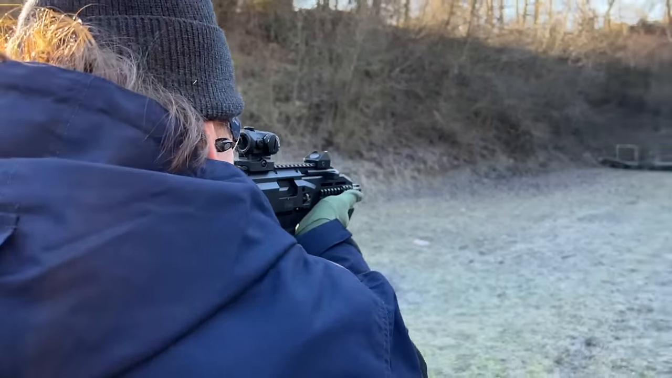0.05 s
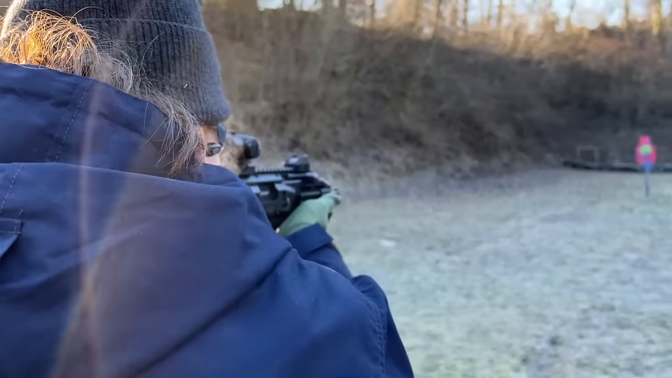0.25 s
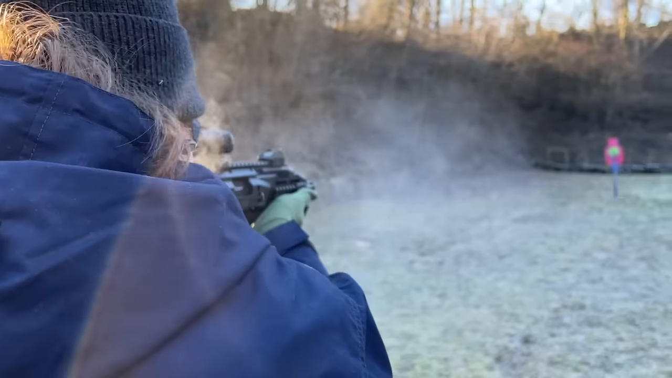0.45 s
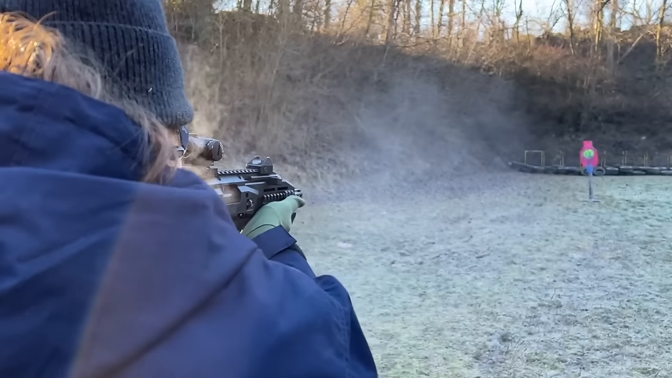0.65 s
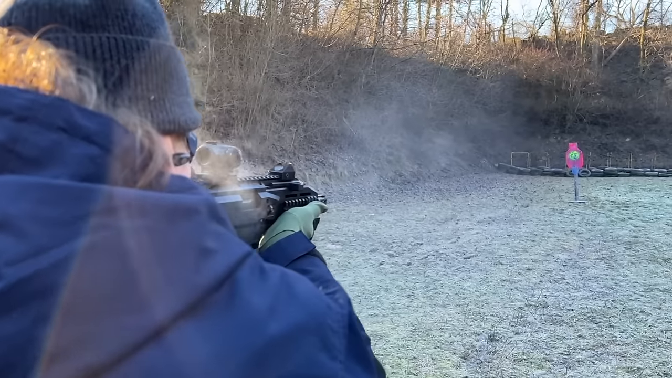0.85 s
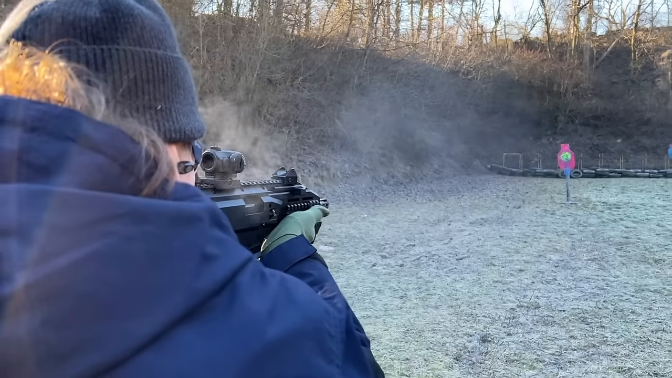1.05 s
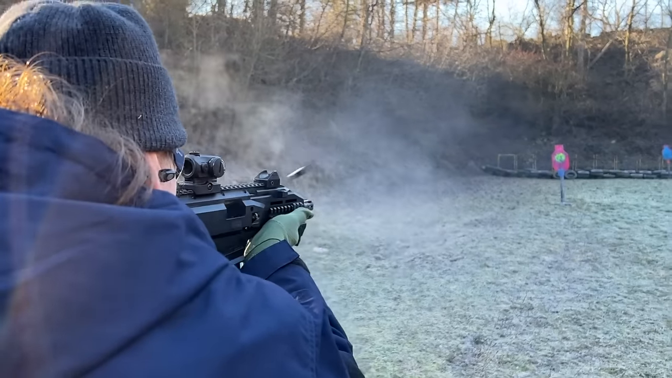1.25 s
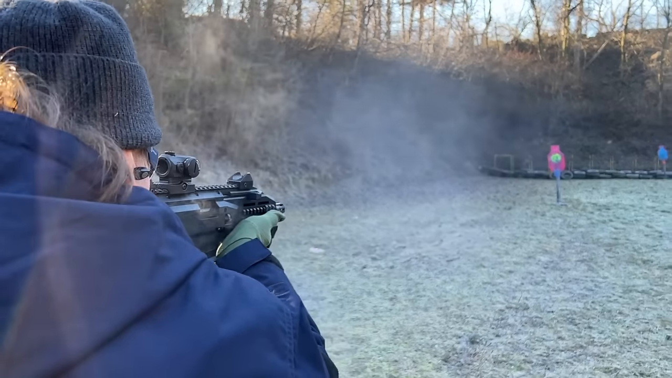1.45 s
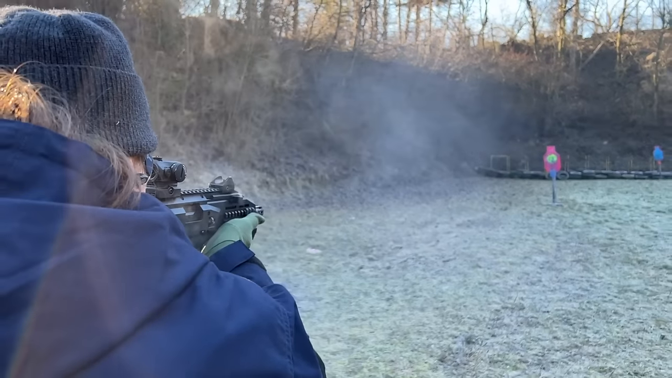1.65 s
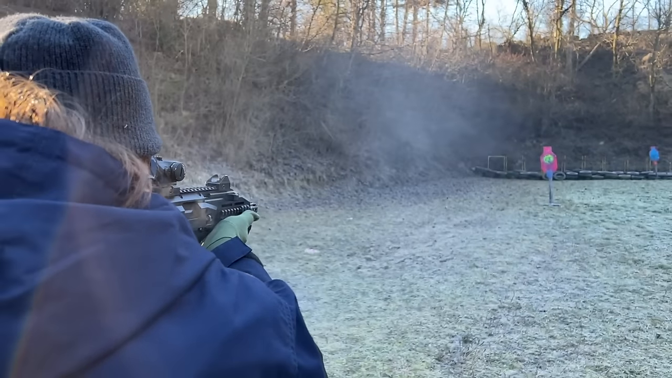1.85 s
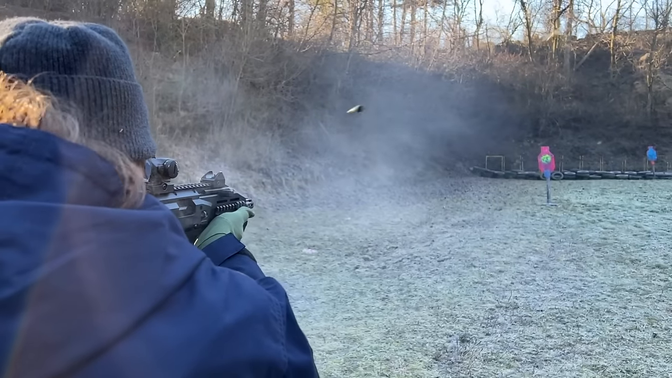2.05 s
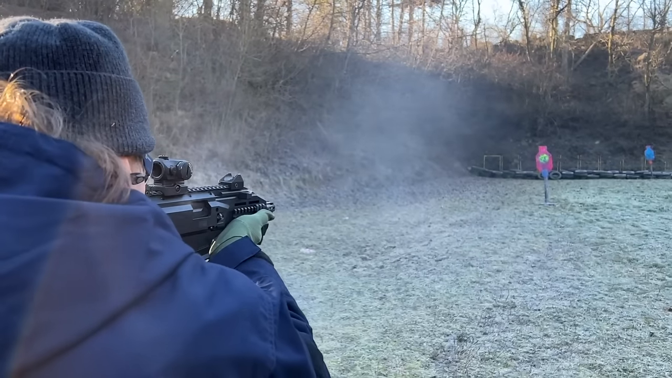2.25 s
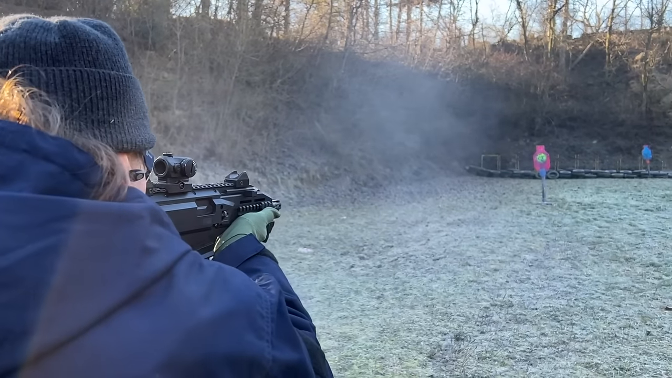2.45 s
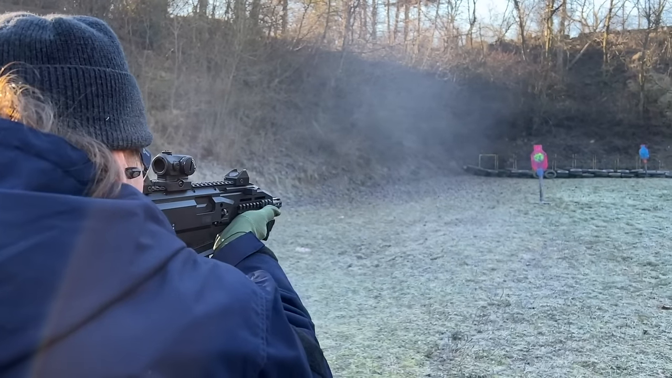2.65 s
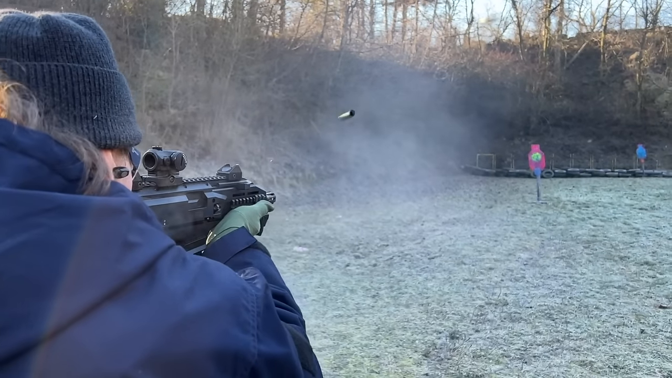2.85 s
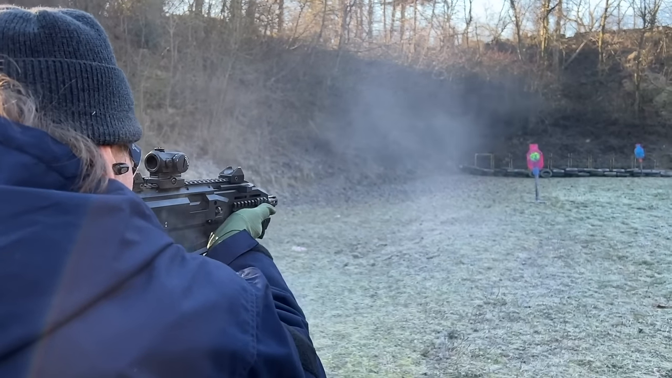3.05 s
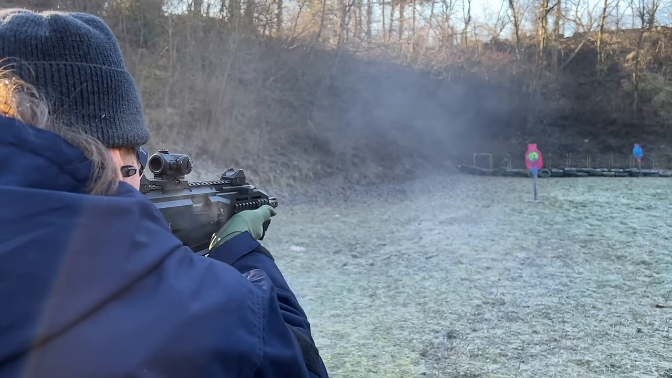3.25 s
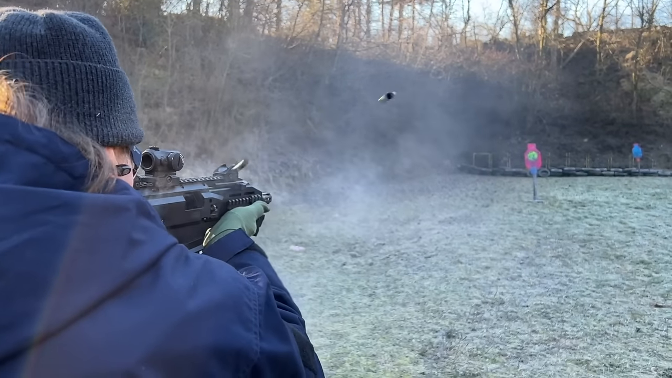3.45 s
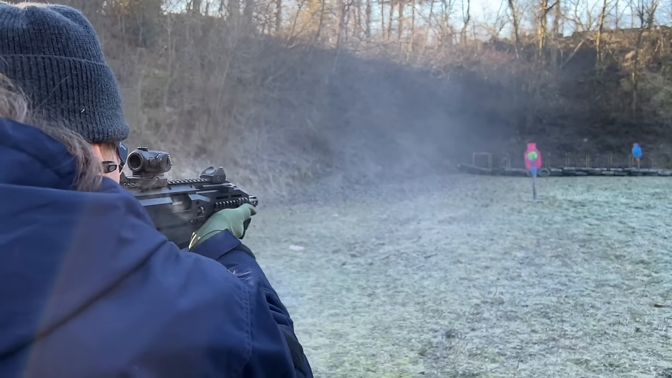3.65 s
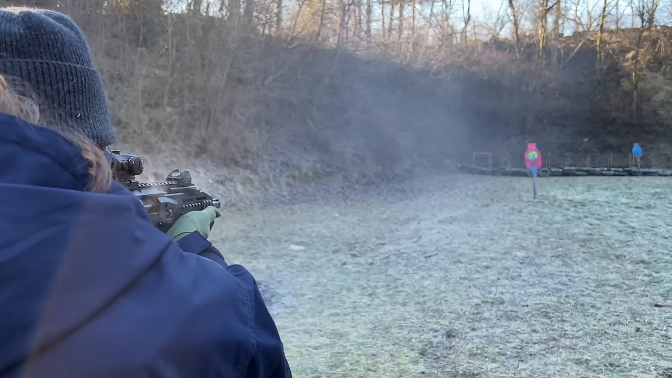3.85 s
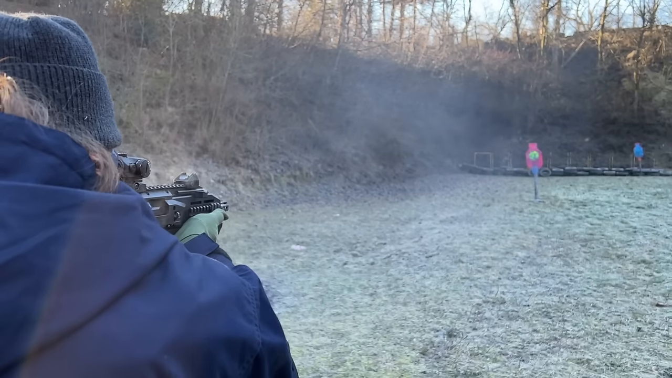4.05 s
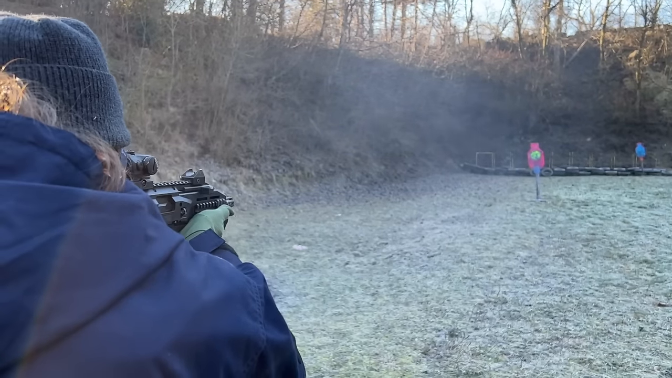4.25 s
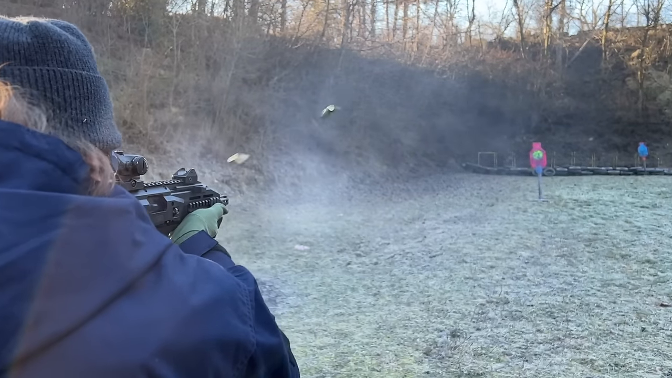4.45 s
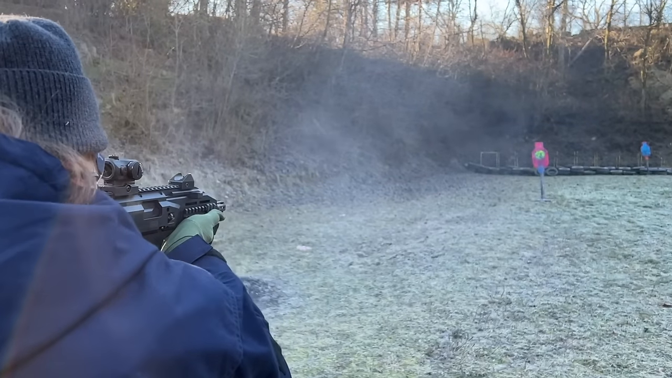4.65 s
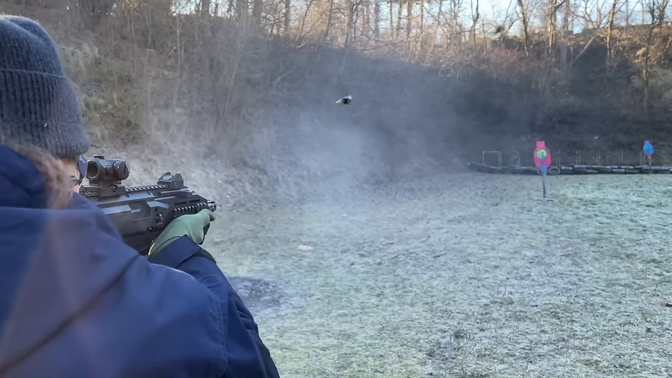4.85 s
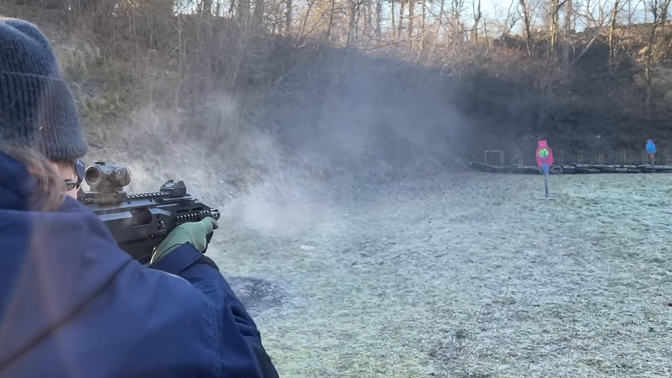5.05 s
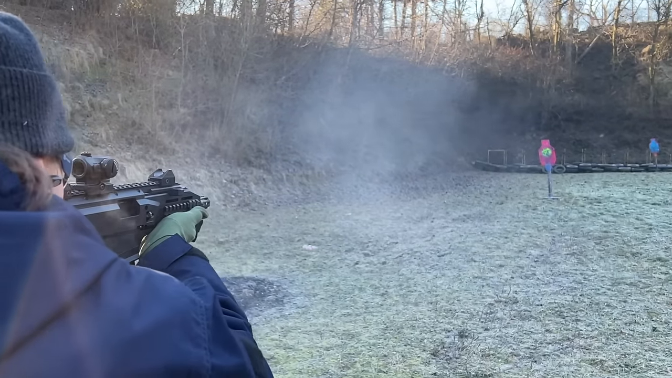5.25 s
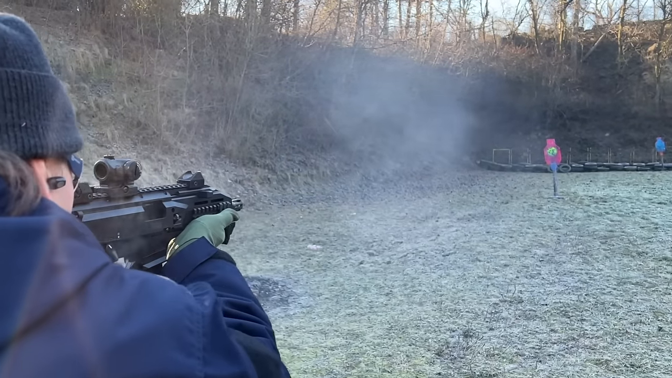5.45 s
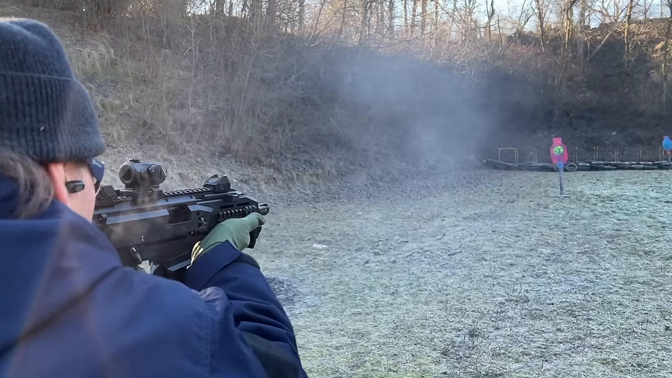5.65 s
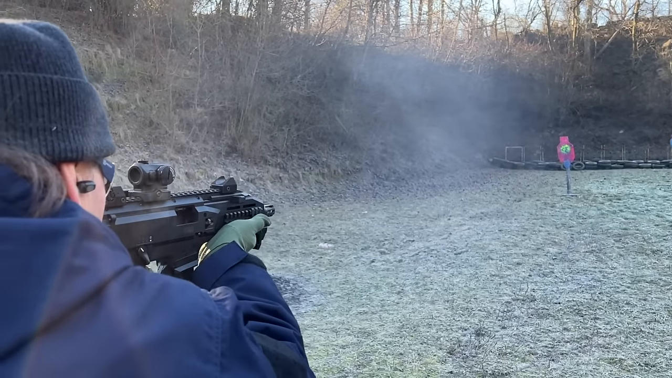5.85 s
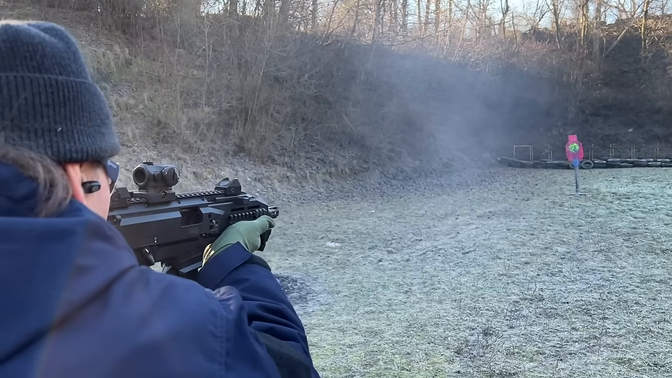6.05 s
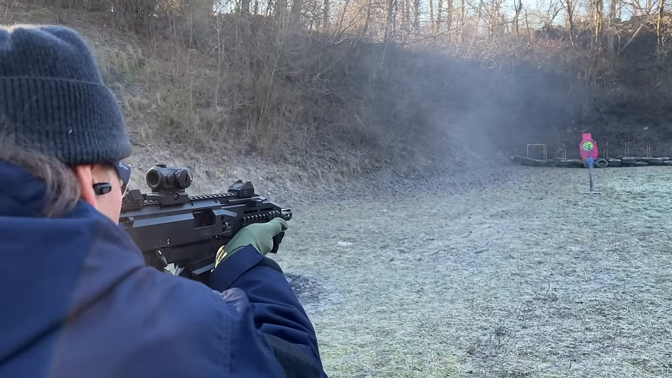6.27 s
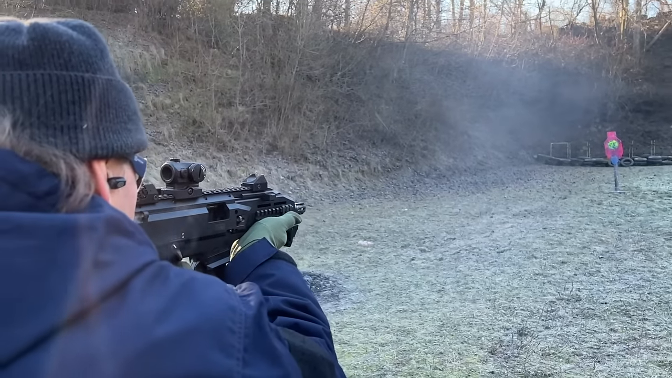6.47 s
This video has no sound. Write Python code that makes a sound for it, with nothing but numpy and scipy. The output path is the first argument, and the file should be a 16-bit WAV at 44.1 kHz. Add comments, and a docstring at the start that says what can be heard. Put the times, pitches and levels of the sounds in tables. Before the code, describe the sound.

Quick paired gunshots, loud and slightly overloaded, burst out right beside the microphone. Bullets ping on a nearer and a farther steel plate a moment later, and noisy echoes wash back from bank and trees. A very faint low hum lies in the pauses above quiet air. The last three bursts come close together, then the echo dies into metallic handling clicks and fabric rustle.

```python
"""On an outdoor range a submachine gun fires two-round bursts, heard just behind the shooter, over low air noise.
Each shot is a noise crack with bolt noise, falling-sweep thumps, then noise echoes from ground, bank and woods.
After the bullet's flight and the way back, steel plates splat and ring in decaying modes; a dull late thud
returns from behind the bank. A faint sine hum fills pauses; handling clicks excite resonances between
and after the bursts, and band-passed noise rustles as clothing once the firing stops."""
import sys
import numpy as np
from scipy import signal
from scipy.io import wavfile

SR = 44100
rng = np.random.default_rng(int(sys.argv[2]) if len(sys.argv) > 2 else 0)


def materialize(psi):
    """Save the field psi as 16-bit PCM at rate SR to the path in sys.argv[1].

    A 1-D psi becomes a single channel; in a 2-D psi each row is a channel.
    """
    bounded = np.clip(np.atleast_2d(psi).T, -1, 1)
    quanta = np.round(bounded * 32767).astype(np.int16)
    wavfile.write(sys.argv[1], SR, quanta)


N = 287114

# shots: t/s, crack level/dB, thump level/dB, echo level/dB
SHOTS = [(0.2729, -2, -8.5, -14.5), (0.3313, -1.5, -7.5, 2.5), (1.223, -2.5, -9, 1.5), (1.28, -3, -8, -6),
         (1.917, -3, -8, -2), (1.9743, -5, -7.5, -5), (2.721, -3, -9.5, -1.5), (2.778, -3, -10, -7),
         (3.372, -2, -9, -2), (3.4275, -4, -11, -6.5), (4.3601, -2.5, -8, -2), (4.4165, -2.5, -13, -8),
         (4.7116, -2.5, -9, -6.5), (4.7674, -2, -7, -8.5), (5.0452, -2.5, -8.5, -3),
         (5.1022, -2, -12.5, -7.5)]


def amp(db):
    """Amplitude ratio of a level in dB."""
    return 10 ** (np.asarray(db) / 20)


def curve(rows, t):
    """Straight lines between (time, value) points."""
    return np.interp(t, *np.transpose(rows))


def at_hz(points, hz):
    """Interpolate (frequency, value) points along log frequency."""
    points_hz, values = np.transpose(points)
    return np.interp(np.log(hz), np.log(points_hz), values)


def clicks(times_s, sizes):
    """A train of single-sample impulses on a tiny offset that keeps filters off denormals."""
    train = np.full(N, 1e-18)
    train[np.round(np.asarray(times_s) * SR).astype(int)] = sizes
    return train


def arrivals(rows, t):
    """Envelope of arrivals that rise, hold and die away; they add in power."""
    power = 1e-20
    for start_s, rise_s, hold_s, db, t60_s in rows:
        fall_db = -60 * np.maximum(t - start_s - rise_s - hold_s, 0) / t60_s
        rise = np.clip((t - start_s) / rise_s, 0, 1)
        power = power + (rise * amp(db + fall_db)) ** 2
    return np.sqrt(power)


def after_each(times_s, db, shape):
    """Envelope in which every event starts the same shape; overlaps add in power."""
    power, shape_power = np.zeros(N), shape ** 2
    for s, gain in zip(times_s, amp(db)):
        i = round(s * SR)
        power[i:i + len(shape)] += gain ** 2 * shape_power[:N - i]
    return np.sqrt(power)


def grain(hz, depth_db):
    """Fast random gain of rms 1: low-passed noise, with corner near hz, moves the level in dB."""
    r = np.exp(-2 * np.pi * hz / SR)
    flicker = signal.lfilter([1], [1, -2 * r, r * r], rng.standard_normal(N))
    gain = amp(depth_db * flicker / flicker.std())
    return gain / np.sqrt(np.mean(gain ** 2))


def band_pass(x, low_hz, high_hz):
    """Butterworth band-pass."""
    return signal.sosfilt(signal.butter(2, [low_hz, high_hz], "band", fs=SR, output="sos"), x)


def resonance(x, hz, width_hz):
    """Two-pole band-pass with gain 1 on top."""
    r, w = np.exp(-np.pi * width_hz / SR), 2 * np.pi * hz / SR
    zeros = np.array([1, 0, -1]) * (1 - r * r) / 2
    poles = [1, -(1 + r * r) * np.cos(w), r * r]
    return signal.lfilter(zeros, poles, x + 1e-18)


def strike(times_s, db, modes, spread_db):
    """Each blow rings every decaying mode with a random strength and sign of its own."""
    out, chance = np.zeros(N), rng.standard_normal((len(times_s), len(modes), 2))
    for k, (hz, level_db, t60_s) in enumerate(modes):
        r, w = amp(-60 / (t60_s * SR)), 2 * np.pi * hz / SR
        sizes = amp(db + level_db + spread_db * chance[:, k, 0]) * np.sign(chance[:, k, 1])
        out += signal.lfilter([0, np.sin(w)], [1, -2 * r * np.cos(w), r * r], clicks(times_s, sizes))
    return out


def noise_bands(spectrum):
    """Half-octave bands of stereo noise as (centre Hz, band); their sum has rms of about 1."""
    # left-right likeness of the noise: f/Hz, likeness (0..1)
    likeness = [(60, 0.86), (500, 0.51), (3000, 0.14), (12000, 0.97)]
    edges_hz, white = 25 * 2 ** np.arange(0, 9.6, .5), rng.standard_normal((2, 2, N))
    centres_hz = np.sqrt(edges_hz[1:] * edges_hz[:-1])
    band_power = amp(at_hz(spectrum, centres_hz)) ** 2 * np.diff(edges_hz)
    total = np.sqrt(np.sum(band_power) / (SR / 2))
    for k, hz in enumerate(centres_hz):
        mid, side = band_pass(white[k % 2], edges_hz[k], edges_hz[k + 1])
        alike = np.clip(at_hz(likeness, hz), 0, 1)
        band = np.sqrt(.5 + alike / 2) * mid + np.sqrt(.5 - alike / 2) * side * [[1], [-1]]
        yield hz, band * amp(at_hz(spectrum, hz)) / total


def sweep(start_hz, end_hz, glide_s, peak_s):
    """A thump: its pitch falls while it swells and dies."""
    t = np.arange(SR // 8) / SR
    pitch_hz = end_hz + (start_hz - end_hz) * np.exp(-t / glide_s)
    phase = 2 * np.pi * np.cumsum(pitch_hz) / SR
    return np.sin(phase) * (t / peak_s) * np.exp(1 - t / peak_s)


def background():
    """Low air noise, loud around the first burst, then sinking; bass after each shot; clothing rustle."""
    # air noise: t/s, level/dB
    noise_level_points = [(0, -73.5), (.25, -54), (.9, -67), (1.8, -75), (3.3, -72.5), (4.1, -77),
                          (5.7, -87.5), (6.5, -76)]
    # air noise spectrum: f/Hz, density/dB per Hz
    air_colour = [(15, -41), (25, -9), (70, -7), (118, -16), (159, -25), (193, -37.5), (492, -40.5),
                  (543, -48.5), (9000, -54), (11700, -89.5), (19800, -120)]
    # bass roll: t after shot/s, rise/s, hold/s, level re thump/dB, t60/s
    roll_rows = [(.02, .05, 0.055, -40, 0.63)]
    # jacket and gloves: t/s, level/dB
    rustle_points = [(5.3, -106), (5.5, -69), (5.74, -89), (5.93, -69), (6.07, -57), (6.2, -62), (6.5, -80)]
    rumble_top_hz = 300
    t = np.arange(N) / SR
    s, _, thump_db, _ = np.transpose(SHOTS)
    air_level = amp(curve(noise_level_points, t))
    rumble = after_each(s, thump_db, arrivals(roll_rows, t[:SR]))
    air = sum(band * np.hypot(air_level, rumble * (hz < rumble_top_hz)) for hz, band in noise_bands(air_colour))
    cloth = band_pass(rng.standard_normal((2, N)), 2200, 8000)
    return air + cloth * amp(curve(rustle_points, t)) * grain(hz=60, depth_db=0.5)


def hum():
    """A faint low sine and a partial about three times as high, perhaps the near plate's low ring."""
    # swells: start/s, rise/s, hold/s, level/dB, t60/s
    swells = [(.5, 0.19, 0.86, -50, 0.59), (1.66, .1, .15, -59, .4), (2.4, 0.062, 0.44, -70.5, 0.57),
              (3.1, .15, .12, -67.5, .5), (4.1, 0.25, .11, -68.5, .5), (5.35, .2, 1, -62.5, .5)]
    # tones: f/Hz, level re swell rms/dB
    tones = [(397.5, 1.5), (1191, -18)]
    t = np.arange(N) / SR
    tone = sum(amp(db) * np.sin(2 * np.pi * hz * t) for hz, db in tones)
    return arrivals(swells, t) * np.sqrt(2) * tone


def handling():
    """Trigger, selector, sling: noise clacks in receiver resonances, a knock, a thin flickering high ring."""
    # clicks: t/s, level/dB, left minus right/dB, high ring re click/dB, knock re click/dB
    click_rows = [(1.1696, -28.5, 4.5, -35, -10), (4.245, -30.5, 4.5, -24, -4), (5.6002, -44, 2, -10, -24),
                  (5.642, -30.5, 2.5, -36, -6), (5.697, -52, 9, -36, -30), (5.7245, -32.5, 1.5, -35, -33),
                  (5.8344, -50, 1.5, -32, -24), (5.914, -23, 1.5, -31.5, -8.5),
                  (6.0178, -51.5, 4, -24, -23), (6.065, -21, 4.5, -40, -5.5), (6.1674, -45.5, 4, -47, -14),
                  (6.3534, -56, -6, -36, 2), (6.368, -41, 4, -50, -19), (6.425, -43, 4, -35, -17.5),
                  (6.461, -53, 3.5, -4, -25), (6.479, -56, 4, -30, -23)]
    # tick, rebound, rattle: t after click/s, rise/s, hold/s, level re click/dB, t60/s
    clack_rows = [(0, 0.0032, 0.0015, 3.5, 0.021), (0.0042, .001, .001, -12.5, .03),
                  (.005, .008, .005, -19, 0.16)]
    # broad receiver resonances: f/Hz, width/Hz, level/dB
    receiver_modes = [(1140, 270, 1), (2050, 390, -3), (2460, 100, 1.5), (3860, 1100, 4.5), (4700, 2800, 1),
                      (5860, 1200, 0.5), (7340, 920, -15.5), (9050, 720, -9)]
    # hollow of the receiver: f/Hz, level/dB, t60/s
    knock_modes = [(540, -4, .02), (630, -2.5, 0.034), (350, -25, 0.098), (715, -2.5, 0.0092)]
    # thin ring near 11 kHz: f/Hz, level/dB, t60/s
    high_ring_modes = [(10200, -6.5, .4), (10880, 0.5, 0.81), (11400, -6.5, .3)]
    s, db, pan_db, high_ring_db, knock_db = np.transpose(click_rows)
    contact = after_each(s, db, arrivals(clack_rows, np.arange(SR // 8) / SR))
    contact = contact * grain(hz=922, depth_db=0.5) * rng.standard_normal(N)
    clack = 0
    for k, (hz, width_hz, level_db) in enumerate(receiver_modes):
        clack = clack + (-1) ** k * amp(level_db) * resonance(contact, hz, width_hz)
    knock = strike(s + .003, db + knock_db, knock_modes, spread_db=2.2)
    high_ring = strike(s, db + high_ring_db, high_ring_modes, spread_db=2.0) * grain(hz=150, depth_db=6.5)
    latest = np.searchsorted(s * SR, np.arange(N) + 1) - 1     # the latest click sets the side
    left, right = (clack + knock + high_ring) * amp(pan_db[latest] / 2 * [[1], [-1]])
    return np.array([np.roll(left, 16), right])     # samples; the gun is nearer to the right port


def plate(hits, modes, ring_db, sustain, shimmer_db, shimmer_t60_s):
    """A bullet bursts in a noise splat; modes ring, wavering as the plate swings, over close-mode shimmer."""
    # bullet bursting: t after hit/s, rise/s, hold/s, level re splat/dB, t60/s
    splat_rows = [(0, .0003, .0005, 4.5, .012)]
    # air and ports: f/Hz, gain/dB
    plate_colour = [(5300, 2), (6400, 4), (7300, 2), (8000, 1), (8500, 0), (9500, 4), (11000, 6),
                    (12500, 7), (15300, 4)]
    s, db, splat_db = np.transpose(hits)
    t, white = np.arange(SR // 2) / SR, rng.standard_normal(N)
    splat = band_pass(white, 1000, 6000) * after_each(s, splat_db, arrivals(splat_rows, t[:SR // 20]))
    shimmer_fall = amp(-60 * t / shimmer_t60_s)
    shimmer = band_pass(white, 6000, 12500) * after_each(s, db + shimmer_db, shimmer_fall)
    heard = [(hz, level_db + at_hz(plate_colour, hz), t60_s * sustain) for hz, level_db, t60_s in modes]
    ring = strike(s, db + ring_db, heard, spread_db=3.0) * grain(hz=12, depth_db=1.2)
    return ring + splat + shimmer


def plates():
    """A near and a far steel plate, almost straight ahead: the right channel lags by one sample."""
    # bullets on each plate: t/s, ring level before ring_db/dB, splat level/dB
    near_hits = [(0.3694, -14, -8.5), (0.4279, -16.5, -18.5), (2.0133, -15, -10.5), (2.0704, -25.5, -27.5),
                 (4.4565, -15.5, -12.5), (4.5127, -7.5, -13), (4.8095, -12.5, -16), (4.8656, -8.5, -13.5),
                 (5.1405, -12.5, -13), (5.1984, -19, -19)]
    far_hits = [(1.4078, -16.5, -28), (1.4644, -20.5, -24), (2.9055, -15.5, -29), (2.9634, -25, -33),
                (3.5563, -15.5, -22), (3.6154, -25, -31)]
    # plate modes: f/Hz, level before colour/dB, t60 before sustain/s
    near_modes = [(130, -14, .15), (240, -11, .12), (400, -14, .15), (1021, -16, .5), (1265, -15, .3),
                  (2358, -20, .4), (2870, -21, .7), (3733, -26, .6), (4110, -26, .6), (5503, -23, .5),
                  (5865, -18, .5), (6255, -14, .4), (6356, -3, .35), (4963, -26, .5), (6804, -36, 1.3),
                  (6999, -8, .4), (7132, -12, .25), (7334, -6, .45), (7397, -13, .5), (7602, -5, .45),
                  (7647, -7, .45), (7819, -4, .55), (7955, -9, .5), (8100, -5, .8), (8267, -7, .45),
                  (8306, 0, .5), (8529, -1, .5), (8635, -1, .4), (8720, -3, .45), (9203, -14, .35),
                  (9293, -11, .4), (9652, -17, .7), (10440, -29, 1.1), (10640, -18, .5), (11100, -18, .5),
                  (11680, -16, .5), (12080, -18, .5), (12570, -21, .45), (15230, -20, .35),
                  (15320, -20, .55)]
    far_modes = [(5353, -20, .4), (6282, -19, .43), (6828, -31, 1.5), (7160, -9, .26), (7978, -10, .3),
                 (8290, -7, .3), (8789, -4, .4), (8909, 0, .3), (9324, -16, .5), (9472, -5, .3),
                 (9862, -6, .35), (10440, -31, 1.1), (10920, -4, .3), (11160, -10, .4), (11470, -10, .2),
                 (11710, -12, .36), (12050, -10, .3), (15420, -16, .26)]
    near = plate(near_hits, near_modes, ring_db=-11.0, sustain=1.0, shimmer_db=-11.0, shimmer_t60_s=0.63)
    far = plate(far_hits, far_modes, ring_db=-10.5, sustain=0.97, shimmer_db=-12.5, shimmer_t60_s=0.28)
    both = near + far
    return np.array([both, np.roll(both, 1)])


def thuds():
    """A dull thud returns last from far behind the bank: only bass survives the longest way round."""
    # thuds: t/s, level/dB
    thud_rows = [(1.649, -51.5), (2.357, -54), (3.149, -44.5), (3.808, -55.5), (5.487, -52)]
    s, db = np.transpose(thud_rows)
    wave = sweep(start_hz=220, end_hz=52, glide_s=0.009, peak_s=0.011)
    return signal.fftconvolve(clicks(s, amp(db)), wave)[:N]


def echoes(times_s, echo_db):
    """Noise returns from undergrowth, bank and trees, dulling with travel; separate slaps flicker."""
    # undergrowth beside the lane, foot and face of the bank, first trees, deep woods:
    # t after shot/s, rise/s, hold/s, level re echo/dB, t60/s
    returns_rows = [(0, 0.098, 0.16, -49, 1.5), (.14, .05, 0.036, -29.5, 0.32),
                    (.22, .04, 0.042, -28, 0.36), (.3, .1, .05, -50.5, 1.2), (.4, 0.084, .1, -65, 5.6)]
    # echo spectrum: f/Hz, density/dB per Hz
    woods_colour = [(18, -44.5), (30, -18.5), (350, -8.5), (432, -1), (533, -4.5), (1660, 1), (3860, -11.5),
                    (8990, -18.5), (11400, -38.5), (12300, -33), (13400, -89), (15200, -31), (16500, -93)]
    # extra loss with travel time: f/Hz, loss/dB per s
    air_loss = [(60, -10.5), (300, 3), (1500, 0), (5000, 17), (15000, 53.5)]
    # extra return from the bank: f/Hz, gain/dB
    bloom = [(100, 0.5), (400, 0), (800, 3), (1600, 3), (3000, -1.5), (8000, 1)]
    bloom_s, bloom_width_s = 0.31, 0.11
    t = np.arange(round(1.2 * SR)) / SR
    swell, returns = np.exp(-((t - bloom_s) / bloom_width_s) ** 2), arrivals(returns_rows, t)
    slaps = [grain(hz=45, depth_db=2.3) for _ in range(3)]
    far = 0
    for k, (hz, band) in enumerate(noise_bands(woods_colour)):
        shape = returns * amp(at_hz(bloom, hz) * swell - at_hz(air_loss, hz) * (t - bloom_s))
        slap = slaps[k // 3 % 3]     # bands an octave and a half wide flicker together
        far = far + band * slap * after_each(times_s, echo_db, shape)
    return far


def thump(times_s, db):
    """The blast as a few falling sweeps from different sides, a little different in every shot."""
    # direct, off the ground, low recoil of the air, bolt at the end of its travel, slow gas push:
    # lag/s, start f/Hz, end f/Hz, glide/s, peak after/s, left level/dB, right level/dB, right later by/s
    wave_rows = [(.0021, 1000, 520, .002, .0017, 2, 1, .0001), (.0068, 750, 290, .002, .0028, -1, 0, .0005),
                 (.0100, 290, 75, .006, .0038, -3, -3, -.001),
                 (.0235, 330, 90, .008, .004, -12, -15, .0015), (.013, 105, 48, .018, .012, -13, -12, .003)]
    wobble_s, wobble_db = .0003, 2.0     # spread from shot to shot
    out, chance = np.zeros((2, N + SR)), rng.standard_normal((len(times_s), len(wave_rows), 2, 2))
    for k, (lag_s, start_hz, end_hz, glide_s, peak_s, left_db, right_db, later_s) in enumerate(wave_rows):
        wave = sweep(start_hz, end_hz, glide_s, peak_s)
        for side, (delay_s, level_db) in enumerate([(lag_s, left_db), (lag_s + later_s, right_db)]):
            for s, shot_db, (shift, loud) in zip(times_s, db, chance[:, k, side]):
                i = round((s + delay_s + wobble_s * shift) * SR)
                out[side, i:i + len(wave)] += amp(shot_db + level_db + wobble_db * loud) * wave
    return out[:, :N]


def crack(times_s, crack_db):
    """Muzzle gas and bolt noise: coloured noise under a fast, grainy envelope, stronger on the left."""
    # muzzle crack, ground bounce, bolt stops at the rear, bolt closes, scatter from close by:
    # t after shot/s, rise/s, hold/s, level re crack/dB, t60/s
    action_rows = [(0, 0.0017, 0.00045, -5.5, .017), (0.00727, 0.0009, 0.0018, -8.5, 0.029),
                   (.018, 0.0018, 0.009, -18, 0.096), (.05, .002, .003, -22, 0.23),
                   (0.014, 0.017, 0.06, -30, 0.65)]
    # crack spectrum: f/Hz, density/dB per Hz
    action_colour = [(30, -25), (120, -1.5), (350, -3), (800, 0), (1200, -6.5), (2100, -1), (4000, -12.5),
                     (8500, -10.5), (11700, -20.5), (15200, -16.5), (16500, -43.5)]
    shape = arrivals(action_rows, np.arange(SR // 2) / SR)
    action = after_each(times_s, crack_db, shape) * grain(hz=302, depth_db=1.0)
    return action * sum(band for hz, band in noise_bands(action_colour)) * amp([[1.5], [-1.5]])


def gunfire():
    """Every shot sends out a crack and a thump; echoes and late thuds come back."""
    s, crack_db, thump_db, echo_db = np.transpose(SHOTS)
    return crack(s, crack_db) + thump(s, thump_db) + echoes(s, echo_db) + thuds()


def scene():
    """Sum of all sources, the hum slightly to the left."""
    return background() + hum() * amp([[1.2], [-1.2]]) + handling() + plates() + gunfire()


def record(dry):
    """Bass roll-off and two dips of the microphone ports, rounded peaks, and the top is cut."""
    # port dips: f/Hz, width/Hz, gain/dB
    mic_notches = [(10150, 690, -23), (13800, 3500, -26.5)]
    cutoff_hz = 17130
    dry = signal.sosfilt(signal.butter(2, 32, "high", fs=SR, output="sos"), dry)
    for hz, width_hz, db in mic_notches:
        dry = dry - (1 - amp(db)) * resonance(dry, hz, width_hz)
    return signal.sosfilt(signal.cheby2(12, 70, cutoff_hz, fs=SR, output="sos"), np.tanh(dry))


dry = scene()
out = record(dry)
materialize(out)
```